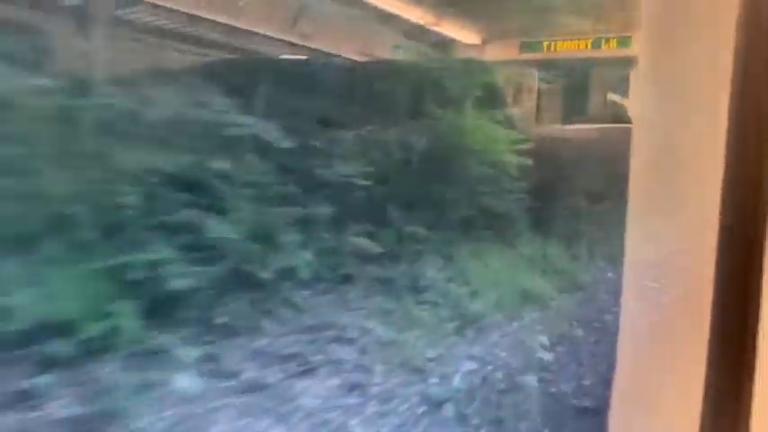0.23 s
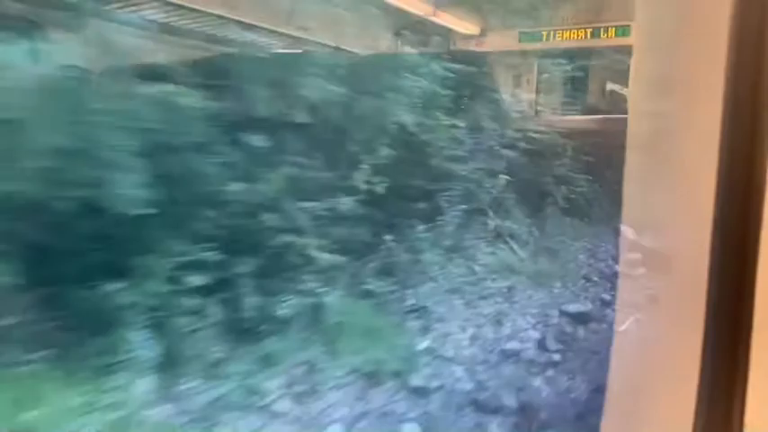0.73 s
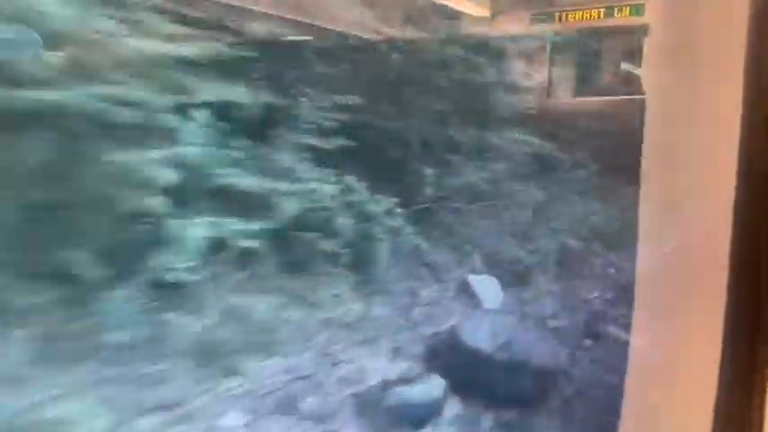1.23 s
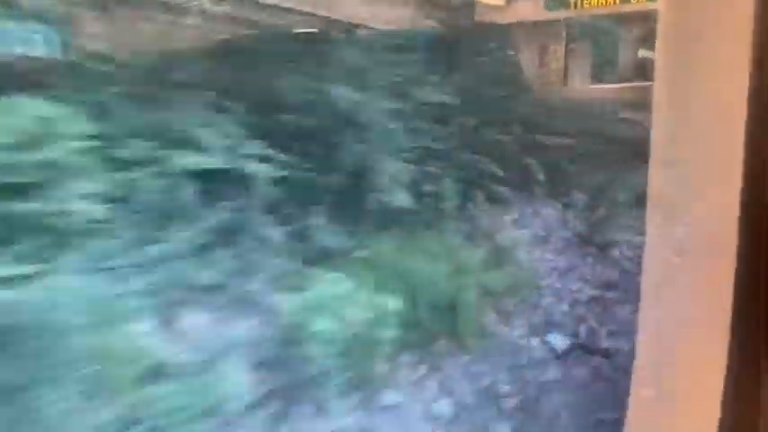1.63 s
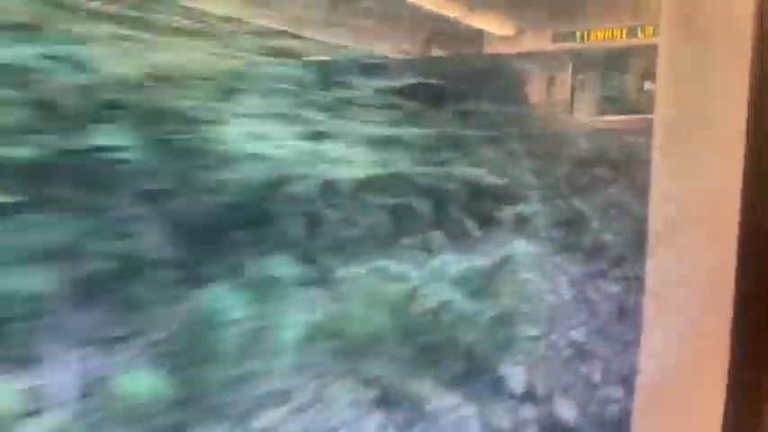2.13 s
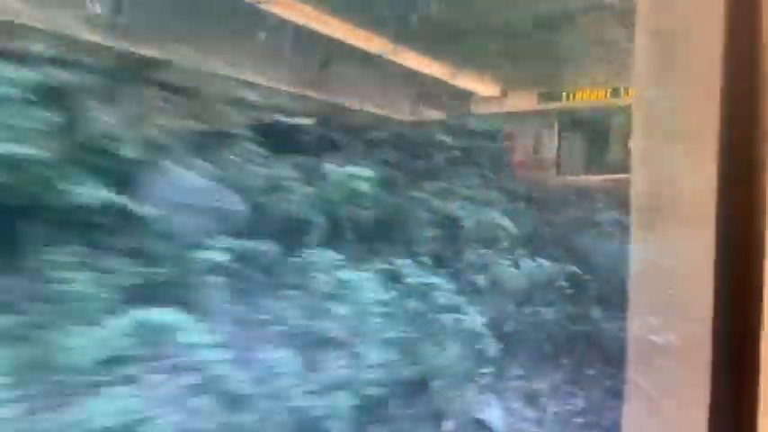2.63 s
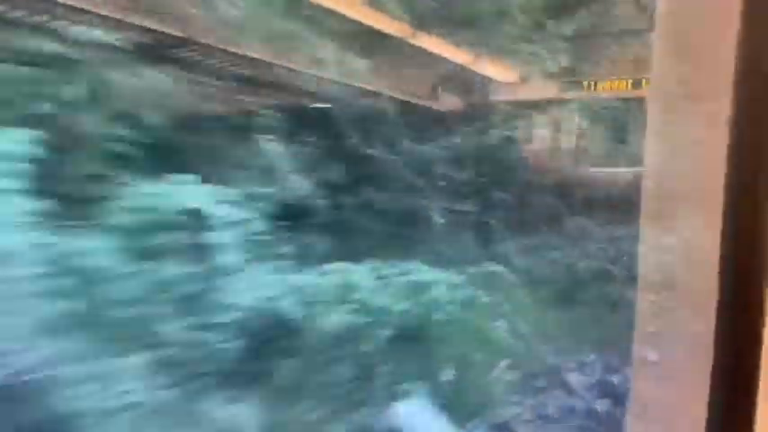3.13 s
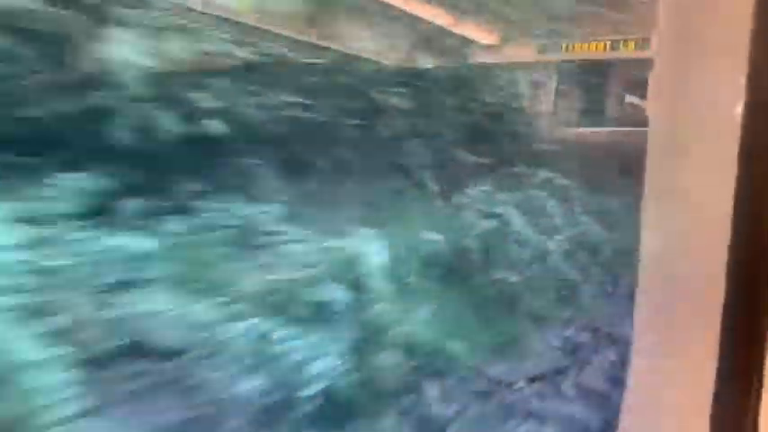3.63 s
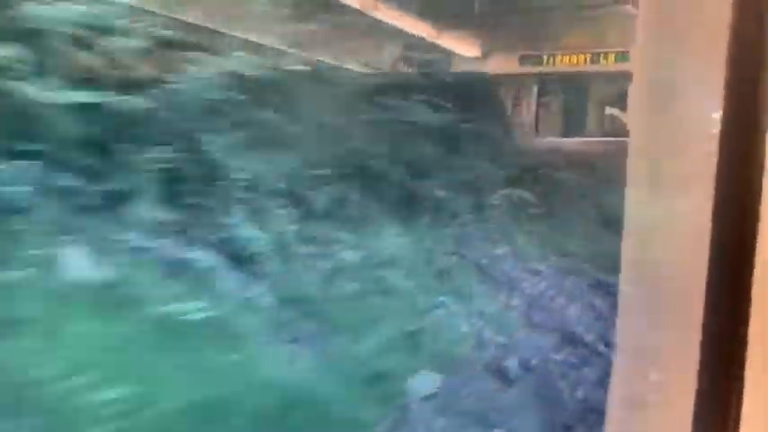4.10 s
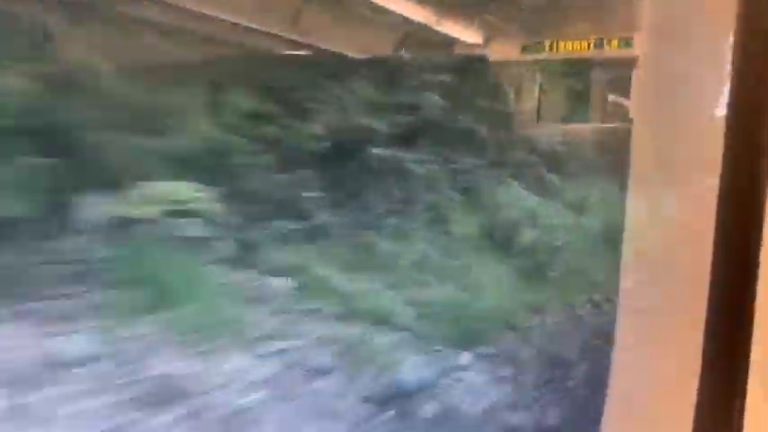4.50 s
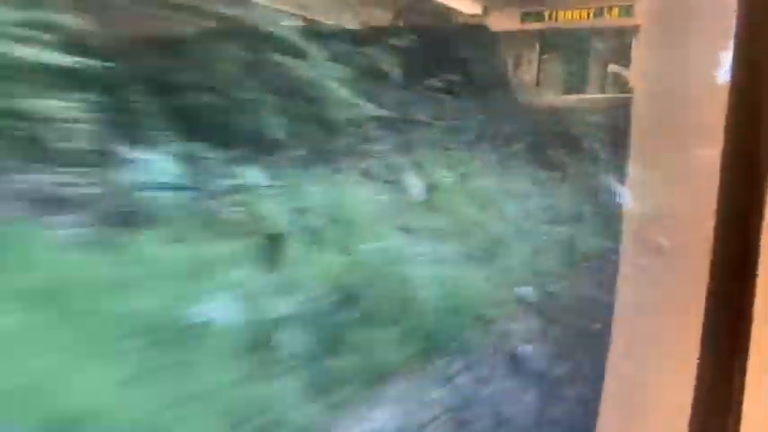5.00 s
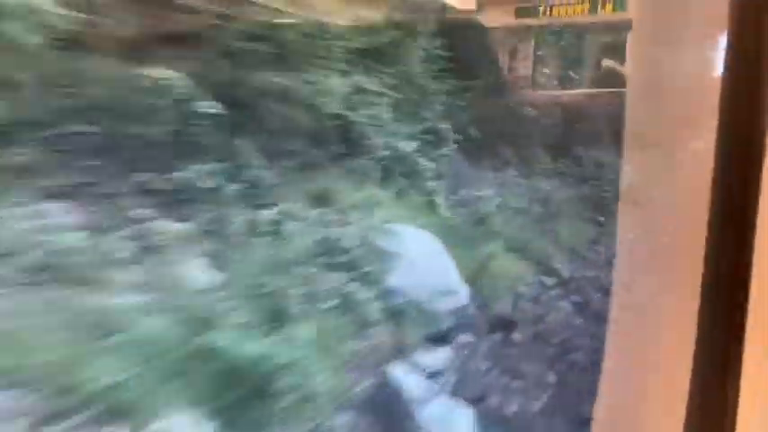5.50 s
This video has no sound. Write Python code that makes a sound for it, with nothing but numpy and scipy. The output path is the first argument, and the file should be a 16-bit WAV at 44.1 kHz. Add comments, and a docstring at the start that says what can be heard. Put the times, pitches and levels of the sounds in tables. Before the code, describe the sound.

Inside a passenger train coach at speed, a heavy low boom and rumble run throughout, swelling unevenly over a soft wheel hiss. Faint squeaks and tiny rattles flicker by. Just after two seconds come sharp ticks and dull knocks, then a thin high squeak. Near five seconds the wheels scrape with a shuddering rush that fades, and one dull knock ends it. Close handheld stereo microphone by the window.

```python
"""Inside a passenger coach rolling steadily: filtered noise gives the boom and rumble of the car body,
the roar, hiss and ring of the wheels and, from the start, a floor drone in surges.
Soon wavering tones squeak and loose trim rattles; then trim ticks and dull panel knocks, both decaying modes.
From the third second the wheels also bite and scrape, most strongly near the fifth: a rush of noise,
a ring of steel and a floor shudder. One dull knock of four quick contacts comes near the end."""
import sys
import numpy as np
from scipy import signal
from scipy.fft import rfft, irfft
from scipy.io import wavfile
from scipy.ndimage import uniform_filter1d, minimum_filter1d

SR = 44100
rng = np.random.default_rng(int(sys.argv[2]) if len(sys.argv) > 2 else 0)


def digitize_waveform(pressure):
    """Quantize a signal to 16-bit integers and store it at the path in sys.argv[1].

    Rows of a 2-D input are taken as channels; values are limited to [-1, 1].
    """
    field = np.atleast_2d(pressure).T
    bounded = np.clip(field, -1, 1)
    quanta = np.round(bounded * 32767).astype(np.int16)
    wavfile.write(sys.argv[1], SR, quanta)


N = 253575
TIME = np.arange(N) / SR
HZ = np.maximum(np.arange(N // 2 + 1) * SR / N, 1)

# The stereo image of the noises. Each row: frequency in Hz, likeness of the two channels from 0 to 1,
# right channel's phase lead in radians, left-right level difference in dB.
STEREO_IMAGE = [(60, 0.98, 0.08, 0), (145, 0.99, 0.33, -1.2), (298, 0.92, 0, -2), (540, 0.85, 0.54, -1.5),
                (776, 0.47, 0, -0.5), (1060, 0.38, 0.6, 5), (1250, 0.09, 4, 0), (1540, 0.14, 1.5, 3.5),
                (1910, 0.58, 0.8, 2), (2700, 0.43, -0.16, 2), (4200, 0.65, 1.6, 1.5), (4780, 0.6, -1, -0.5),
                (5600, 0.2, 1.3, 3), (6750, 0.83, -1, -2.5), (7250, 0.8, 0.5, 2.5), (7730, 1, 0.5, -3),
                (11500, 1, 7, 0.5), (12900, 1, 8.5, -1), (15200, 0.95, 13, 1.5)]

# Noise spectra of the car body and the wheels. Each row: frequency in Hz, relative level in dB per Hz.
BOOM_SPECTRUM = [(15, -42.5), (25, -38.5), (33, -23), (40, -11), (47, -15), (54, -3.5), (59, 2), (65, -5),
                 (76, -11.5), (88, -17.5), (105, -36.5)]
RUMBLE_SPECTRUM = [(70, -26), (90, -7.5), (110, -5.5), (122, -6), (147, -3), (170, -3.5), (182, -4),
                   (215, -7), (268, -8.5), (288, -16), (345, -17), (400, -29), (500, -36.5)]
ROAR_SPECTRUM = [(230, -14.5), (330, -1.5), (420, 2.5), (500, 0.9), (580, 0.5), (680, -3), (800, -3),
                 (950, -8.5), (1200, -17), (1600, -28.5)]
HISS_SPECTRUM = [(700, -25), (1100, 1), (1400, -0.3), (1750, 0.05), (2200, -1), (2550, -6), (3100, -5),
                 (3500, -9.5), (4500, -8), (5500, -14.5), (7200, -16.5), (8500, -22.5), (11000, -23.5),
                 (15500, -31.5)]

# Swells and dips of the boom. Each row: start in seconds, length in seconds,
# change of level in dB (negative for a dip).
BOOM_SWELLS = [(0.03, 0.14, 5), (.26, 0.056, 5.5), (0.506, 0.054, 5), (0.837, 0.062, 5.5),
               (1.255, 0.054, -5), (1.345, 0.28, 6), (1.64, 0.26, 4), (1.962, 0.11, 5), (2.557, 0.19, 5),
               (2.866, 0.082, 7), (3.36, 0.056, 4), (3.535, 0.14, 4.5), (4.56, 0.15, 5.5), (4.917, 0.17, 6),
               (5.227, 0.13, 5.5)]
BOOM_DB, RUMBLE_DB = -20, -18.5  # boom between swells, and rumble
BOOM_ATTACK_S, BOOM_RELEASE_S = 0.0056, 0.026

# Rail roughness, as the level of the wheels' hiss. Each row: time in seconds, level in dB.
RAIL_ROUGHNESS = [(0, -44), (.25, -43.5), (.6, -45), (1.08, -43.5), (1.62, -45), (1.92, -43), (2.33, -45.5),
                  (2.6, -44.5), (3.03, -46.5), (3.5, -44), (4.5, -44), (5.75, -43.5)]
# Resonances of the wheels. Each row: frequency in Hz, width in Hz, level over the hiss in dB.
WHEEL_MODES = [(1558, 87, 6.5), (1857, 37, -2.5), (2173, 33, 2.5), (2780, 40, -4)]
ROAR_DB, ROAR_FOLLOWS = -34.5, 0.46  # level at mean roughness; share of the hiss's swing
RING_SWING_DB, RING_WAVER = 2.5, .008  # spread of the ring's level; spread of its pitch as a share

# Surges of one floor mode. Each row: start in seconds, length in seconds, level in dB.
DRONE_SURGES = [(0.025, 0.12, -23.5), (0.439, 0.19, -19), (0.883, .06, -24), (1.054, .12, -26),
                (1.236, 0.096, -14.5), (1.416, 0.059, -20.5), (1.702, 0.066, -16.5), (2.14, 0.23, -19.5),
                (2.597, 0.33, -20), (3.055, 0.066, -19), (3.48, 0.2, -21), (3.922, .21, -22),
                (4.304, 0.41, -21), (4.712, 0.46, -18.5), (5.21, 0.074, -13.5), (5.315, 0.11, -25),
                (5.55, 0.16, -22.5)]
# Spectrum of that mode. Each row: frequency in Hz, relative level in dB per Hz.
DRONE_SPECTRUM = [(115, -11.5), (132, -6.5), (147, 0.5), (168, -3), (185, -13), (210, -19.5)]
DRONE_ATTACK_S, DRONE_RELEASE_S = 0.027, 0.057

# Wheel modes sung by a rubbing flange. Each row: start in seconds, length in seconds, mean frequency in Hz,
# level before the sag in dB, spread of the pitch wander in Hz, rasp from 0 to 1.
FLANGE_SQUEAKS = [(.138, .16, 1880, -48, 25, .6), (.146, .16, 2810, -42, 15, .4),
                  (.205, 0.081, 4090, -49, 30, .7), (0.257, .16, 4065, -48, 16, 0.4),
                  (.685, .14, 4070, -52.5, 25, .7), (1.02, .09, 3340, -50, 35, .7),
                  (1.055, 0.1, 7290, -54.5, 35, .5), (1.36, .11, 3260, -49.5, 46, .7),
                  (1.365, .1, 1860, -48, 30, .7), (1.744, .12, 4060, -49.5, 38, .9),
                  (1.985, .12, 4100, -55, 25, 0.6), (2.255, .16, 2440, -45.5, 45, 0.8),
                  (2.26, .11, 11014, -57, 70, .9), (2.27, .11, 3220, -53.5, 50, .7),
                  (2.429, .185, 4064, -36.5, 9, 0), (2.45, .22, 5580, -57, 15, .3),
                  (3.82, .3, 1874, -45, 35, 0.7), (3.82, .3, 2770, -47, 35, 0.8),
                  (5.51, .24, 2790, -49, 27, 1)]
SQUEAK_ATTACK_S, SQUEAK_SAG_DB_PER_S, SQUEAK_RELEASE_S = .022, 55, .07
SQUEAK_FLUTTER_DB = 1.8

# Runs of loose trim. Each row: start in seconds, length in seconds, level in dB.
RATTLE_RUNS = [(0.205, 0.065, -50), (1.024, 0.097, -50.5), (1.353, 0.062, -53), (2.266, .07, -54.5),
               (3.045, 0.044, -54), (3.459, 0.062, -50.5), (3.79, .04, -53)]
# Spectrum of the rattling trim. Each row: frequency in Hz, relative level in dB per Hz.
RATTLE_SPECTRUM = [(2400, 3.5), (3200, 3.5), (3800, -7), (4700, 0), (5600, -17), (6400, -5.5), (7300, -9),
                   (10500, -16.5), (15000, -26)]
RATTLE_TOUCHES_PER_S, TOUCH_DECAY_S = 320, .0012  # mean rate; time for a touch's power to fall to 1/e

# Hard contacts on the trim. Each row: time in seconds, level in dB, contact bandwidth in Hz.
TRIM_TICKS = [(1.19, -24, 4000), (2.0838, -12.5, 2200), (2.1292, -18.5, 9000), (2.166, -26, 4000),
              (2.2425, -21, 5000)]
# The trim's modes. Each row: frequency in Hz, relative level in dB, t60 in seconds.
TRIM_MODES = [(1050, -9, .005), (1600, -5, .006), (4000, -21, .003), (6500, -24, .003)]

# Contacts that make dull knocks on a panel close by. Each row: time in seconds, level in dB,
# contact bandwidth in Hz, pitch as a factor, left-right level difference in dB.
PANEL_CONTACTS = [(2.1231, -9.8, 1000, 1.04, -5), (2.1310, -8.2, 850, .9, 4), (5.7155, -11.5, 850, 1.04, 1),
                  (5.7178, -8, 850, 1.08, 1), (5.7193, -12, 900, 1.08, 1), (5.7207, -9, 820, 1.04, 2)]
# The panel's modes. Each row: frequency in Hz before the pitch factor, relative level in dB, t60 in seconds.
PANEL_MODES = [(560, -4.5, .026), (690, 0, .011), (860, -3, .012), (1600, -2, .012)]
RIGHT_CHANNEL_EARLY_S = .0003

# Bites of the sliding wheels. Each row: start in seconds, rush peak in dB, rush t60 in seconds,
# shudder peak in dB, shudder t60 in seconds.
WHEEL_BITES = [(2.25, -41.5, 0.55, -45, .4), (3.785, -42, 2.7, -39.5, 0.84),
               (4.677, -34.5, 1.3, -26.5, 0.55), (4.774, -24.5, 0.72, -20, 0.42),
               (4.978, -35.5, 1.2, -26.5, 1)]
# Spectra of steel on steel and of the shaken floor. Each row: frequency in Hz, relative level in dB per Hz.
RUSH_SPECTRUM = [(700, -3), (950, -2), (1300, -6), (1550, -2), (1750, -4.5), (2200, -5.5), (2600, -12),
                 (3100, -11.5), (3500, -14), (4600, -13), (7000, -24.5), (10000, -31), (15500, -40.5)]
SHUDDER_SPECTRUM = [(230, -16), (350, 9.5), (450, -3), (570, 1.5), (670, 1.5), (790, 0.5), (930, -5),
                    (1100, -17)]
# Steel that rings on after a bite. Each row: frequency in Hz, width in Hz, relative level in dB.
STEEL_MODES = [(1150, 70, -7.5), (1530, 90, -4.5), (1910, 71, -1.5), (2225, 80, -1), (2465, 40, -6),
               (3140, 120, -12), (3980, 110, -12), (4380, 50, -14)]
SCRAPE_ATTACK_S, GRAIN_DB = .011, 1
# The steel's ring: level against the rush, rise, and factor on the rush's t60.
STEEL_DB, STEEL_ATTACK_S, STEEL_LINGERS = -5, .035, 1.05
SHUDDER_ATTACK_S, CHATTER_DB = 0.019, 1

CEILING, CUTOFF_HZ = .89, 15800  # limiter's peak level; top of the passband


def from_db(db):
    """Level is logarithmic: 20 dB is a tenfold gain."""
    return 10 ** (np.asarray(db) / 20)


def rms_one(x):
    """Normalisation: the root of the mean power becomes 1."""
    return x / np.sqrt(np.mean(x ** 2) + 1e-20)


def in_time(rows):
    """Linear interpolation of each column of a curve at every sample."""
    s, *columns = np.transpose(rows)
    return [np.interp(TIME, s, column) for column in columns]


def in_hz(rows):
    """Interpolation of each column of a spectrum along logarithmic frequency."""
    hz, *columns = np.transpose(rows)
    return [np.interp(np.log(HZ), np.log(hz), column) for column in columns]


def colour(rows):
    """Spectral shaping: a curve in dB at every frequency, falling by 48 dB an octave beyond its ends."""
    octaves_outside = np.abs(np.log2(HZ / np.clip(HZ, rows[0][0], rows[-1][0])))
    return in_hz(rows)[0] - 48 * octaves_outside


def peaks(rows):
    """Resonance: the gain of modes whose powers add, relative to the noise that drives them."""
    power = sum(from_db(db) ** 2 / (1 + 2 * ((HZ - hz) / width) ** 2) ** 2 for hz, width, db in rows)
    return np.sqrt(power)


def drift(rate_hz):
    """Low-passed random fluctuation with an rms of 1."""
    spectrum = rfft(rng.standard_normal(N))
    return rms_one(irfft(spectrum / (1 + (HZ / rate_hz) ** 2), N))


def cabin_noise(colour_db):
    """Partial coherence: shared and separate noise mix in two channels; their mean has a spread of 1."""
    alike, lead, tilt_db = in_hz(STEREO_IMAGE)
    alike = np.clip(alike, 0, .999)
    shared, *own = rfft(rng.standard_normal((3, N)))
    side = np.array([[.5], [-.5]])  # left, right
    common = np.sqrt(alike) * shared * np.exp(-1j * side * lead)
    channels = common + np.sqrt(1 - alike) * np.array(own)
    gain = from_db(colour_db + side * tilt_db) / np.sqrt(1 + alike)
    x = irfft(channels * gain, N)
    return x / np.std(x.mean(axis=0))


def evened(x, seconds):
    """Division by smoothed power removes a noise's own slow swells."""
    power = uniform_filter1d(x.mean(axis=0) ** 2, int(seconds * SR))
    smooth_power = uniform_filter1d(power, int(seconds * SR / 2))
    return x / np.sqrt(smooth_power + 1e-9)


def swell(s, length, attack, release):
    """Linear envelope: rises from time s, holds, and falls once its length is over; 0-1."""
    rise = (TIME - s) / attack
    fall = 1 - (TIME - s - length) / release
    return np.clip(np.minimum(rise, fall), 0, 1)


def dying(rows, attack):
    """Exponential decay of several bites (s, peak dB, t60 s) after a linear rise; their powers add."""
    power = 0
    for s, db, t60 in rows:
        rise = np.clip((TIME - s) / attack, 0, 1)
        decay_db = 60 * np.maximum(TIME - s - attack, 0) / t60
        power = power + (rise * from_db(db - decay_db)) ** 2
    return np.sqrt(power)


def car_body():
    """Forced vibration: bogies shake floor and walls into a rumble, and cabin air into a boom that swells."""
    swells_db = sum(db * swell(s, length, BOOM_ATTACK_S, BOOM_RELEASE_S) for s, length, db in BOOM_SWELLS)
    boom = from_db(BOOM_DB + swells_db) * evened(cabin_noise(colour(BOOM_SPECTRUM)), seconds=0.098)
    rumble = from_db(RUMBLE_DB) * evened(cabin_noise(colour(RUMBLE_SPECTRUM)), seconds=0.14)
    return boom + rumble


def wheels():
    """Roughness excitation: steel rolling on steel gives a dull roar, a hiss and a wavering modal ring."""
    hiss_db, = in_time(RAIL_ROUGHNESS)
    roar_db = ROAR_DB + ROAR_FOLLOWS * (hiss_db - hiss_db.mean())
    roar = from_db(roar_db + 0.75 * drift(24)) * cabin_noise(colour(ROAR_SPECTRUM))
    hiss = from_db(hiss_db + 0.79 * drift(6.7)) * cabin_noise(colour(HISS_SPECTRUM))

    drive = from_db(colour(HISS_SPECTRUM))
    ringing = drive * peaks(WHEEL_MODES)
    ring_gain = np.linalg.norm(ringing) / np.linalg.norm(drive)
    ring = cabin_noise(20 * np.log10(ringing)) * ring_gain
    # reading the ring at an uneven pace makes its pitch waver
    wavering_s = TIME + RING_WAVER * np.cumsum(drift(9.04)) / SR
    ring = np.array([np.interp(wavering_s % TIME[-1], TIME, channel) for channel in ring])
    return roar + hiss + from_db(hiss_db + RING_SWING_DB * drift(5.6)) * ring


def floor_drone():
    """Modal response: a narrow band of low noise from one floor mode, in surges whose powers add."""
    power = sum((from_db(db) * swell(s, length, DRONE_ATTACK_S, DRONE_RELEASE_S)) ** 2
                for s, length, db in DRONE_SURGES)
    return np.sqrt(power) * evened(cabin_noise(colour(DRONE_SPECTRUM)), seconds=0.08)


def squeaks():
    """Stick-slip: a rubbing flange sings one wheel mode, which builds, sags, wavers, rasps and dies away."""
    out = np.zeros((2, N))
    waver, flutter, grit = drift(118), drift(32), drift(300)
    for s, length, hz, db, wander_hz, rasp in FLANGE_SQUEAKS:
        on = (TIME >= s) & (TIME < s + length)
        envelope = swell(s, length - SQUEAK_RELEASE_S, SQUEAK_ATTACK_S, SQUEAK_RELEASE_S)[on]
        sag_db = SQUEAK_SAG_DB_PER_S * (TIME[on] - s)
        level_db = db - sag_db + SQUEAK_FLUTTER_DB * flutter[on]
        phase = 2 * np.pi * np.cumsum(hz + wander_hz * waver[on]) / SR
        tone = (np.sin(phase) + rasp * grit[on] * np.cos(phase)) / np.hypot(1, rasp)
        out[:, on] += np.sqrt(2) * from_db(level_db) * envelope * tone
    return out


def rattles():
    """Random impacts: loose trim chatters in short runs of tiny, uneven, decaying touches."""
    touches = (rng.random(N) < RATTLE_TOUCHES_PER_S / SR) * rng.exponential(1, N)
    decay = np.exp(-1 / (2 * TOUCH_DECAY_S * SR))
    chatter = rms_one(signal.lfilter([1], [1, -decay], touches + 1e-18))
    runs = sum(from_db(db) * swell(s, length, attack=.012, release=0.035) for s, length, db in RATTLE_RUNS)
    return runs * chatter * cabin_noise(colour(RATTLE_SPECTRUM))


def ticks():
    """Impulse response: a hard contact rings the trim for milliseconds; its bandwidth limits the high modes."""
    out = np.zeros(N)
    for s, db, contact_hz in TRIM_TICKS:
        on = (TIME >= s) & (TIME < s + .02)
        age = TIME[on] - s
        ring = sum(from_db(db + mode_db - 60 * age / t60) * np.sin(2 * np.pi * hz * age)
                   for hz, mode_db, t60 in TRIM_MODES)
        contact = signal.butter(2, contact_hz, fs=SR, output="sos")
        out[on] += signal.sosfilt(contact, ring)
    return out


def knocks():
    """Damped modes: a contact rings a panel for a few cycles; its narrow bandwidth weakens the higher modes."""
    out = np.zeros((2, N))
    for s, db, contact_hz, pitch, pan_db in PANEL_CONTACTS:
        near = np.abs(TIME - s) < .05
        age = np.maximum(TIME[near] - s + np.array([[0], [RIGHT_CHANNEL_EARLY_S]]), 0)
        ring = sum(from_db(mode_db - 60 * age / t60) * np.sin(2 * np.pi * pitch * hz * age)
                   for hz, mode_db, t60 in PANEL_MODES)
        contact = signal.butter(4, contact_hz, fs=SR, output="sos")
        channel_gain = from_db(db + pan_db * np.array([[.5], [-.5]]))
        out[:, near] -= channel_gain * signal.sosfilt(contact, ring)  # the first swing is negative
    return out


def scrape():
    """Sliding friction: each bite gives a bright rush, a slower-building ring of steel and a floor shudder."""
    bites = np.array(WHEEL_BITES)
    rush_level = dying(bites[:, :3], SCRAPE_ATTACK_S) * from_db(GRAIN_DB * drift(350))
    rush = rush_level * cabin_noise(colour(RUSH_SPECTRUM))
    steel = evened(cabin_noise(20 * np.log10(peaks(STEEL_MODES))), seconds=0.05)
    ring = from_db(STEEL_DB) * dying(bites[:, :3] * [1, 1, STEEL_LINGERS], STEEL_ATTACK_S) * steel
    floor = evened(cabin_noise(colour(SHUDDER_SPECTRUM)), seconds=0.05)
    shudder_level = dying(bites[:, [0, 3, 4]], SHUDDER_ATTACK_S) * from_db(CHATTER_DB * drift(70))
    return rush + ring + shudder_level * floor


def scene():
    """Superposition: the pressures of all sources add in each channel."""
    rolling = car_body() + wheels() + floor_drone()
    return rolling + squeaks() + rattles() + ticks() + knocks() + scrape()


def record(dry):
    """Gain reduction and low-pass filtering: a smooth limiter holds down crests, and the top is cut steeply."""
    allowed = CEILING / np.maximum(np.abs(dry).max(axis=0), CEILING)
    gain = uniform_filter1d(minimum_filter1d(allowed, size=441), size=441)
    low_pass = signal.ellip(10, .1, 90, CUTOFF_HZ, fs=SR, output="sos")
    return signal.sosfilt(low_pass, dry * gain)


dry = scene()
out = record(dry)
digitize_waveform(out)
```